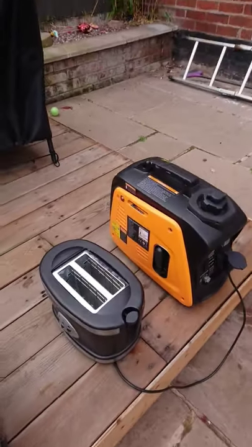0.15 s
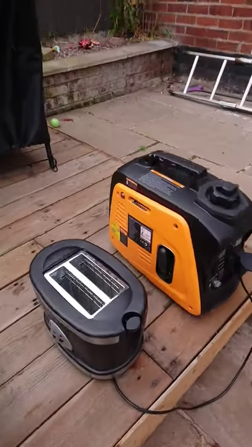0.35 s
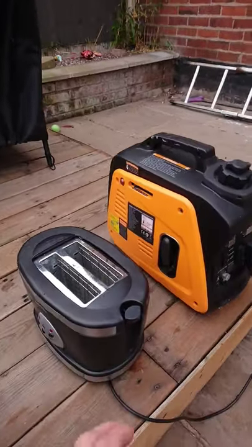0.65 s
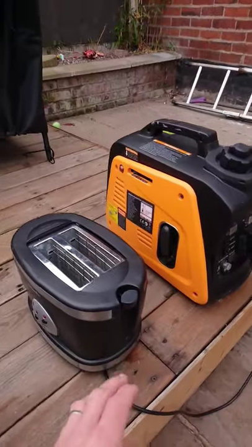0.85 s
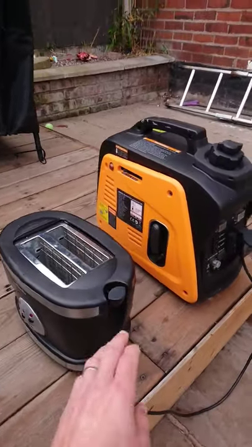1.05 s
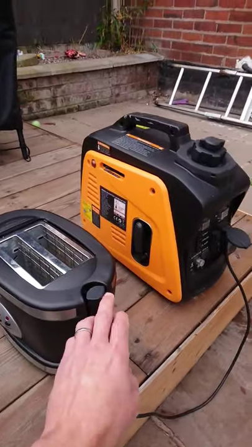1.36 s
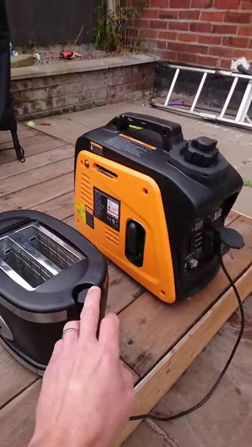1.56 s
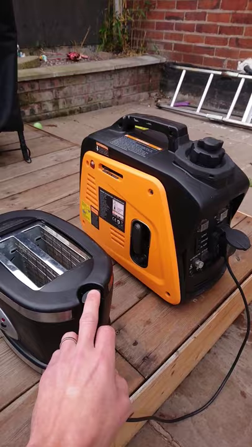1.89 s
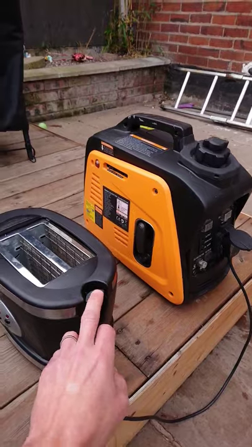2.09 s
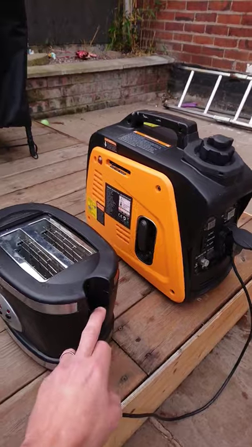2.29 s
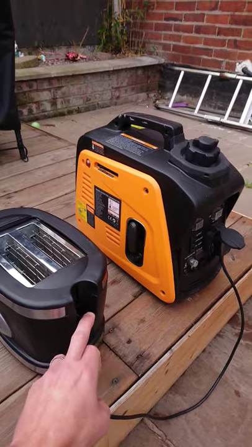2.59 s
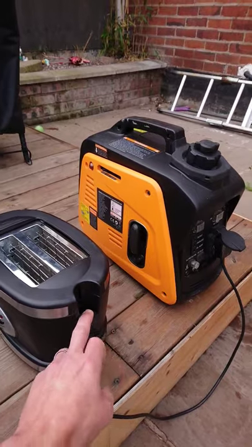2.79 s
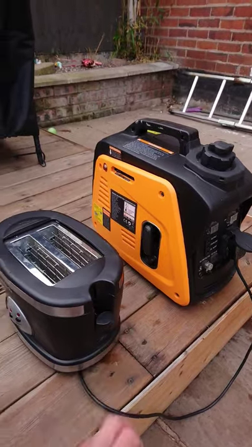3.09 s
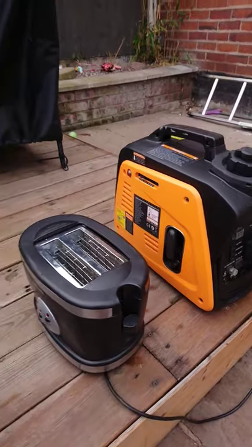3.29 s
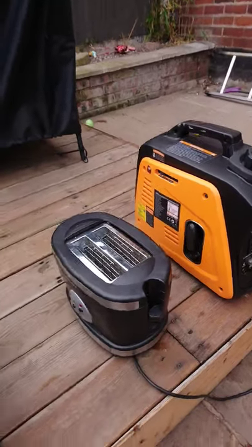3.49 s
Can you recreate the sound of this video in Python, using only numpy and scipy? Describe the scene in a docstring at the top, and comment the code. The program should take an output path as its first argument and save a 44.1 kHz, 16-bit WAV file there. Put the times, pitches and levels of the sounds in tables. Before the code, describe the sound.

Portable generator engine droning steadily, bogging down and revving up when a toaster is switched on.

```python
"""A small four-stroke petrol generator idles on a wooden deck, close to a hand-held phone.
Each cycle gives an exhaust thump, a row of knocks and a rasp of gas, over the rush of the cooling fan.
From about 1 s a side panel sings faintly along.
Near 2 s a toaster lever ticks twice, then clicks and scrapes down.
At 2.4 s the engine sags under the load and opens its throttle; louder now, it speeds up to the end."""
import sys
import numpy as np
from scipy import signal
from scipy.fft import rfft, irfft, next_fast_len
from scipy.io import wavfile
from scipy.ndimage import map_coordinates

SR = 44100
rng = np.random.default_rng(int(sys.argv[2]) if len(sys.argv) > 2 else 0)


def unload_wav(signal):
    """Save mono or channel-first audio to the path in sys.argv[1] as 16-bit WAV at rate SR, clipped to [-1, 1]."""
    wavfile.write(
        sys.argv[1],
        SR,
        np.round(np.clip(np.atleast_2d(signal).T, -1, 1) * 32767).astype(np.int16),
    )


N = 160965


def undb(db):
    """Turn decibels into a number to multiply by."""
    return 10 ** (np.asarray(db) / 20)


def curve(rows):
    """Join (time [s], value) points with straight lines."""
    return np.interp(np.arange(N) / SR, *np.array(rows).T)


def unit(x):
    """Scale a sound to an average (rms) size of 1."""
    return x / np.sqrt(np.mean(x ** 2))


def wander(per_second):
    """Drift between random values, about 1 either side of zero."""
    return 0.95 * np.interp(np.arange(N) * per_second / SR, np.arange(8192), rng.standard_normal(8192))


def ringing_response(db):
    """Turn levels by frequency into a filter that rings after a hit, never before it."""
    cepstrum = irfft(np.log(undb(db)))
    half = len(cepstrum) // 2
    cepstrum[1:half] *= 2
    cepstrum[half + 1:] = 0
    return np.exp(rfft(cepstrum))


def colour(x, points, peaks=()):
    """Shape a sound's tone by (frequency [Hz], level [dB]) points, plus any ringing peaks."""
    size = 2 * next_fast_len(x.shape[-1])
    hz = np.maximum(np.fft.rfftfreq(size, 1 / SR), 1)
    point_hz, point_db = np.array(points).T
    db = np.interp(np.log(hz), np.log(point_hz), point_db)
    db += sum(boost / (1 + (2 * (hz - centre) / width) ** 2) for centre, width, boost in peaks)
    return irfft(rfft(x, size) * ringing_response(db))[..., :x.shape[-1]]


def stereo_noise(size=N, shared_below_hz=1500):
    """Hiss whose low notes are alike left and right, and whose high notes are unrelated."""
    shared, left, right = rfft(rng.standard_normal((3, size)))
    share = 1 / (1 + (np.fft.rfftfreq(size, 1 / SR) / shared_below_hz) ** 2)
    return irfft(np.sqrt(share) * shared + np.sqrt(1 - share) * np.array([left, right]), size)


# Exhaust harmonics (tones at 1, 2, 3... times the firing rate) when idling, straining at low speed
# and revved up: (relative level [dB])
IDLE_DB = [-62, -34, -39, -43, -39, -39, -42, -57, -39, -45, -51, -61, -52, -64, -59, -63, -61, -62, -61,
           -64, -63, -59]
STRAINING_DB = [-56, -25, -30, -32, -40, -29, -46, -38, -32, -40, -44, -50, -41, -49, -56, -48, -39, -57,
                -47, -46, -54, -51]
REVVED_DB = [-50, -24, -31, -33, -45, -28, -32, -40, -35, -37, -44, -44, -46, -49, -40, -41, -40, -44, -48,
             -46, -52, -57]
# The thump at idle, then under load: (push or pull [+1 or -1], place in cycle [0-1], bass lag [cycles])
THUMP_SHAPES = [(-1, .19, .26), (1, .57, 1.46)]


def exhaust(cycles, speed, load):
    """The exhaust thumps once a cycle; under load it is heavier and its voice shifts with speed."""
    straining_hz, revved_hz = 35.5, 38.3
    revved = np.clip((speed - straining_hz) / (revved_hz - straining_hz), 0, 1)
    harmonics = np.arange(len(IDLE_DB)) + 1
    angle = 2 * np.pi * (cycles + 0.0013 * wander(70))  # slightly uneven timing
    thumps = []
    for db, (sign, place, bass_lag) in zip((IDLE_DB, STRAINING_DB), THUMP_SHAPES):
        ring = ringing_response(np.pad(db, (1, 3), mode="edge"))[harmonics]
        delay = np.exp(-2j * np.pi * (harmonics * place + bass_lag * np.log(harmonics)))
        thumps.append(sign * ring * delay)
    out = 0
    for k, idle, heavy, change_db in zip(harmonics, *thumps, np.subtract(REVVED_DB, STRAINING_DB)):
        strength = idle * np.maximum(1 - load, 0) ** 2 + heavy * load * undb(change_db * revved)
        waver = undb(0.1176 * k * wander(9))  # higher tones waver more
        out = out + np.real(strength * np.exp(1j * k * angle)) * waver
    return np.sqrt(2) * out * undb(1.5 + 0.07 * wander(35))


# Valve and piston knocks: (place in cycle [0-1], relative level at idle [dB],
# relative level at full load [dB], pitch [Hz], level of that pitch against the rattle [dB])
KNOCKS = [(.07, -19, -2, 1233, 13), (0.169, -0.5, -7, 1120, -4.5), (.26, -14, -3.5, 1550, 9),
          (.43, -4.5, 5.5, 1110, 1.5), (.5, 2.5, 3.5, 1620, -11), (.57, 4.5, -5, 1340, -4.5),
          (0.901, 1, 1.5, 1486, -7.5)]
# Tone of the engine's casing: (frequency [Hz], relative level [dB])
CASING_TONE = [(250, -17), (450, -2), (700, 7.5), (920, -7), (1150, 3.5), (1500, -1.5), (2000, -9),
               (2900, -8), (5000, -6.5), (15000, -43.5)]
# Notes at which its panels ring: (frequency [Hz], width [Hz], boost [dB])
PANEL_RINGS = [(813, 20, 6), (1155, 40, 2), (1519, 24, 3.5), (2260, 150, 1), (2820, 150, 3.5),
               (3140, 100, 4.5), (4590, 1460, 3.5)]


def knocks(cycles, load):
    """Valves and piston strike at set places in the cycle; each short note also rattles the casing."""
    level_db, scatter_db, jitter_s = -43, 1.9, 0.00004
    rattle_s, tone_rise_s = 0.035, 0.00072
    t = np.arange(SR // 10) / SR
    each_cycle = np.arange(int(cycles[-1]) + 1)
    out = 0
    for place, idle_db, load_db, hz, tone_db in KNOCKS:
        late, size = rng.standard_normal((256, 2))[each_cycle].T
        at = np.interp(each_cycle + place, cycles, np.arange(N)) + late * jitter_s * SR
        inside = (at > 0) & (each_cycle + place < cycles[-1]) & (at < N)
        hits = np.bincount(at[inside].astype(int), undb(scatter_db * size[inside]), N)
        hits *= undb(idle_db + (load_db - idle_db) * load)
        rattle = stereo_noise(len(t)) * np.exp(-np.log(1000) * t / rattle_s)  # 60 dB down at rattle_s
        tone = t * np.exp(-t / tone_rise_s) * np.sin(2 * np.pi * hz * t)
        knock = unit(colour(rattle, CASING_TONE, PANEL_RINGS)) + undb(tone_db) * unit(tone)
        out = out + signal.fftconvolve(hits[None], knock)[:, :N]  # one knock at every hit
    return unit(out) * undb(level_db)


# Bursts from gas and valves: (place in cycle [0-1], fade [cycles], idle level [dB], full-load level [dB])
RASP_BURSTS = [(0.34, 0.17, -40.5, -26.5), (0.01, 0.15, -78, -30.5)]
# Tone of the rasp: (frequency [Hz], relative level [dB])
RASP_TONE = [(300, -44), (1000, 5.5), (2500, -6), (5000, 4.5), (8000, 3), (11500, 5.5), (15500, -0.5)]


def gas_rasp(cycles, load):
    """Gas rasps out in gritty bursts as the valves open, a little stronger or weaker each cycle."""
    rise_cycles, scatter_db, grit_db = 0.044, 1.07, 1.5
    loudness = 0
    for place, fade, idle_db, load_db in RASP_BURSTS:
        cycle, age = np.divmod(cycles - place + 1, 1)
        chance_db = scatter_db * rng.standard_normal(256)[cycle.astype(int)]
        burst = np.minimum(age / rise_cycles, 1) * np.exp(-np.maximum(age - rise_cycles, 0) / fade)
        loudness = loudness + burst * undb(idle_db + (load_db - idle_db) * load + chance_db)
    return unit(colour(stereo_noise(), RASP_TONE)) * loudness * undb(grit_db * wander(1100))


# Clicks of the toaster lever: (time [s], level [dB], fade [s])
LEVER_CLICKS = [(1.932, -40, .005), (2.225, -31, 0.0056), (2.296, -25.5, .011)]
# Tone of the lever: (frequency [Hz], relative level [dB])
LEVER_TONE = [(300, -22), (2000, -11), (5500, -7), (7000, -9), (10000, 0), (14000, -5.5), (16000, 7)]
# Ring of its metal: (frequency [Hz], width [Hz], boost [dB])
LEVER_RING = [(6730, 320, 14)]


def toaster():
    """The lever ticks twice, then clicks as its metal carriage starts to scrape down."""
    start_s, end_s, fade_s, scrape_db = 2.28, 2.46, 0.063, -35.5
    t = np.arange(N) / SR
    scrape = np.clip(np.minimum(t - start_s, end_s - t) / fade_s, 0, 1)
    loudness = scrape * undb(scrape_db + 2.5 * wander(300))
    for at, db, fade in LEVER_CLICKS:
        loudness += (t >= at) * undb(db) * np.exp(-np.abs(t - at) / fade)
    return unit(colour(stereo_noise(), LEVER_TONE, LEVER_RING)) * loudness


# How strongly the side panel sings: (time [s], level [dB])
WHINE_LEVEL = [(0, -71), (.75, -70), (1, -51.5), (2.35, -54.5), (2.55, -53), (2.88, -43.5), (3.08, -40),
               (3.22, -65), (3.65, -48)]


def panel_whine(cycles, speed):
    """A side panel sings along with whichever engine harmonic passes through its own note."""
    note_hz, width_hz = 819, 38
    side_db = np.array([[-6.5], [6.5]])  # louder on the right
    tone = 0
    for k in range(21, 26):
        off_note = 2 * (k * speed - note_hz) / width_hz
        tone = tone + np.sin(2 * np.pi * k * cycles) / (1 + off_note ** 2)
    return np.sqrt(2) * tone * undb(curve(WHINE_LEVEL) + wander(14) + side_db)


# Tone of the fan's air: (frequency [Hz], relative level [dB])
FAN_TONE = [(20, -11), (60, 12.5), (150, 7), (300, 8.5), (500, 5.5), (1000, -2), (2000, -4), (4500, -3),
            (8000, -8), (15500, -10.5)]


def cooling_fan(load):
    """Cooling air rushes through the casing, harder under load."""
    idle_db, load_db, flutter_db = -40.5, -33.5, 2
    air = unit(colour(stereo_noise(), FAN_TONE, PANEL_RINGS))
    return air * undb(idle_db + (load_db - idle_db) * load + flutter_db * wander(150))


# How fast the engine runs: (time [s], firing rate [Hz])
ENGINE_SPEED = [(0.0, 35.15), (0.45, 34.32), (0.85, 34.24), (1.03, 33.76), (1.3, 34.01), (1.65, 34.58),
                (2.0, 34.37), (2.15, 33.93), (2.36, 34.52), (2.44, 31.97), (2.53, 32.81), (2.75, 34.63),
                (3.12, 36.16), (3.33, 37.7), (3.65, 39.02)]
# How hard it works: (time [s], throttle [0 idle, 1 full load])
THROTTLE = [(0, 0.062), (2.4, 0.014), (2.49, 0.83), (2.72, 0.88), (3.05, 1.013), (3.25, 0.99), (3.65, 0.98)]
# The generator is louder when the phone is nearer: (time [s], level [dB])
NEARNESS = [(0, -2.5), (.55, -1.1), (1.1, -1), (2.3, 0), (3.65, -0.5)]


def scene():
    """Speed and throttle drive all parts of the generator; the toaster stands beside it."""
    speed, load = curve(ENGINE_SPEED), curve(THROTTLE)
    cycles = np.cumsum(speed) / SR  # engine cycles counted so far
    engine = exhaust(cycles, speed, load) + knocks(cycles, load) + gas_rasp(cycles, load)
    left, right = engine + panel_whine(cycles, speed) + cooling_fan(load)
    lag_s = 0.00014  # the right microphone hears the generator later
    right = map_coordinates(right, [np.arange(N) - lag_s * SR], order=5, mode="nearest")
    return np.array([left, right]) * undb(curve(NEARNESS)) + toaster()


# Tone of the phone's two microphone openings: (frequency [Hz], left level [dB], right level [dB])
MICROPHONE_TONE = [(105, 0.5, -1.5), (366, 2.2, -2), (736, 1.5, -1.2), (1190, 3.5, -0.5), (2420, 6, 0),
                   (4080, -1.5, -4), (5850, -2.5, -6), (7030, -9.5, -14.5), (7460, -20.5, -24),
                   (7930, -12.5, -18), (8770, -9.5, -25), (9635, 11, -1), (9750, 15, -5), (11000, 6.5, -30),
                   (10800, 10.5, -24), (12050, 4, -4), (13500, 2.5, 2.5), (15400, 1, -8)]


def record(dry):
    """Each microphone opening colours the sound in its own way; the very highest notes are cut."""
    top_hz = 15600
    tones = np.array(MICROPHONE_TONE)
    heard = np.array([colour(dry[side], tones[:, [0, side + 1]]) for side in range(2)])
    return signal.sosfilt(signal.ellip(10, .2, 80, top_hz, fs=SR, output="sos"), heard)


dry = scene()
out = record(dry)
unload_wav(out)
```